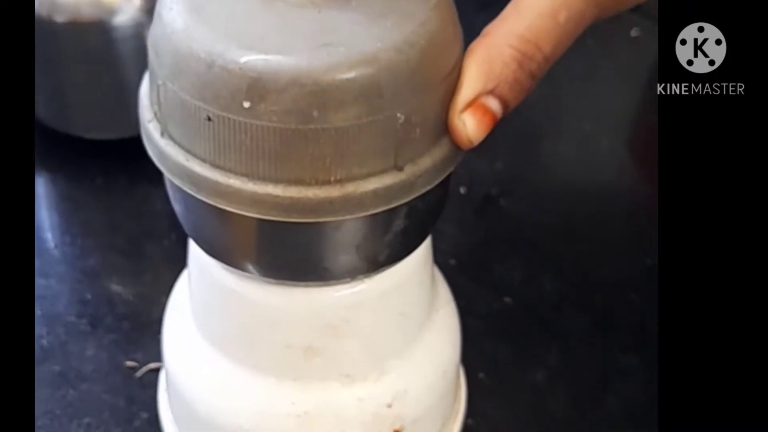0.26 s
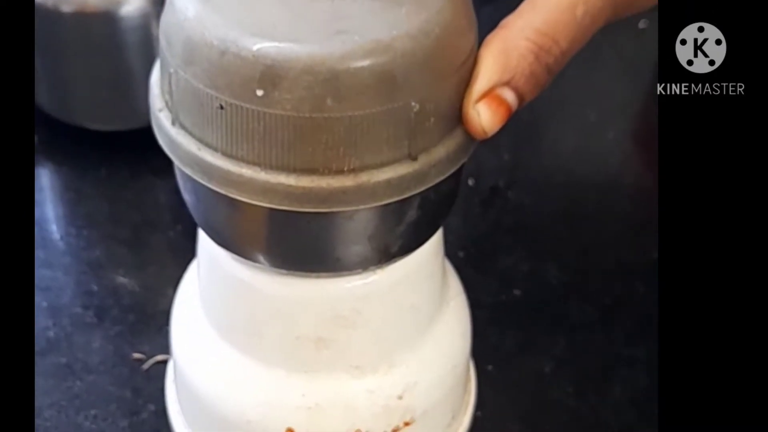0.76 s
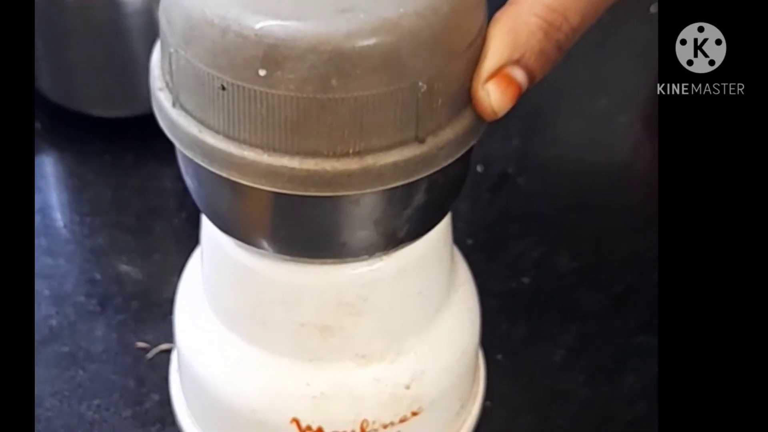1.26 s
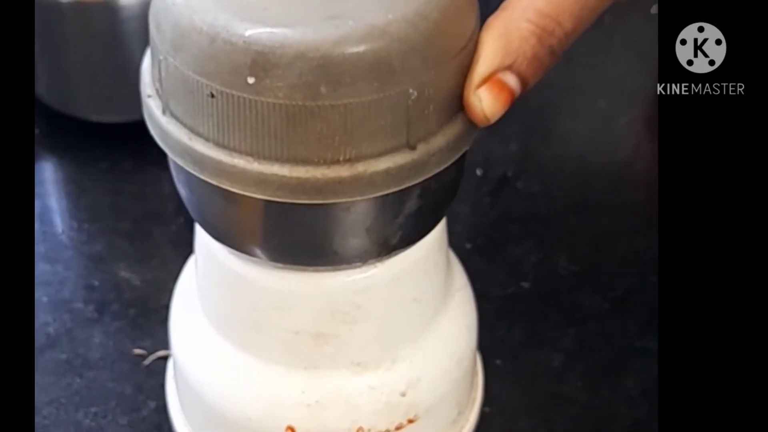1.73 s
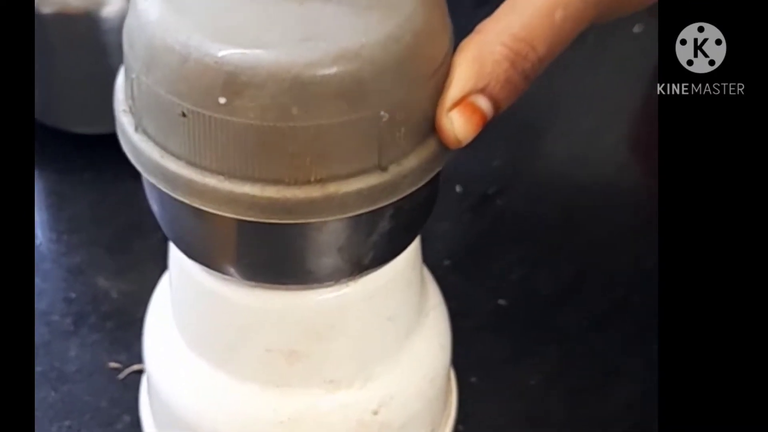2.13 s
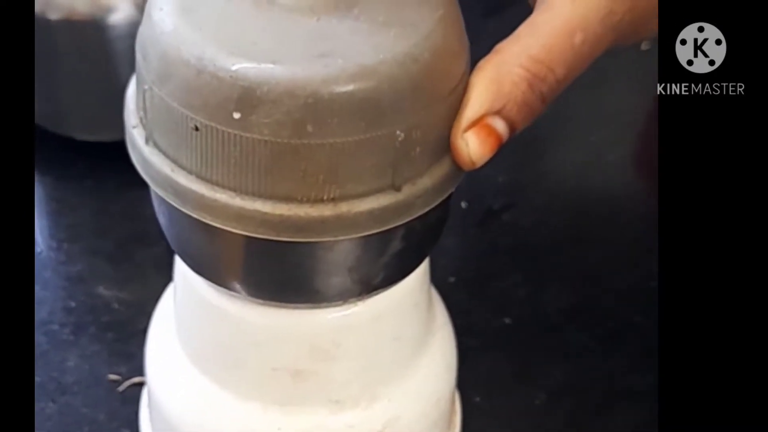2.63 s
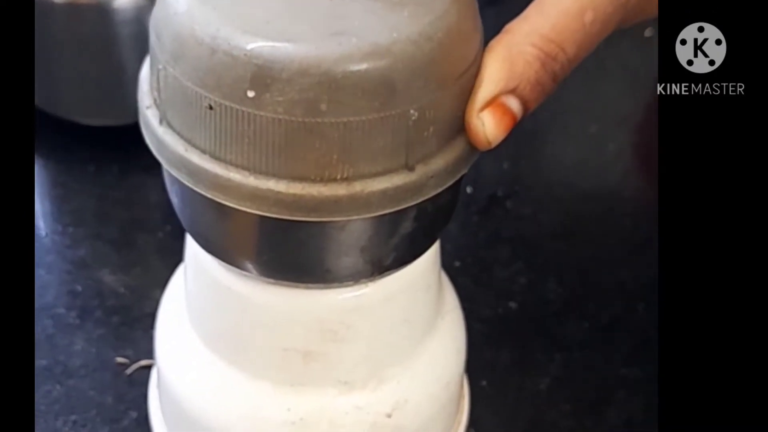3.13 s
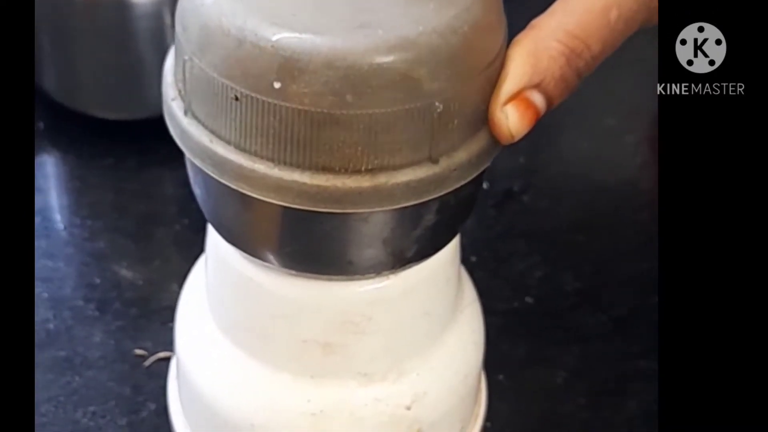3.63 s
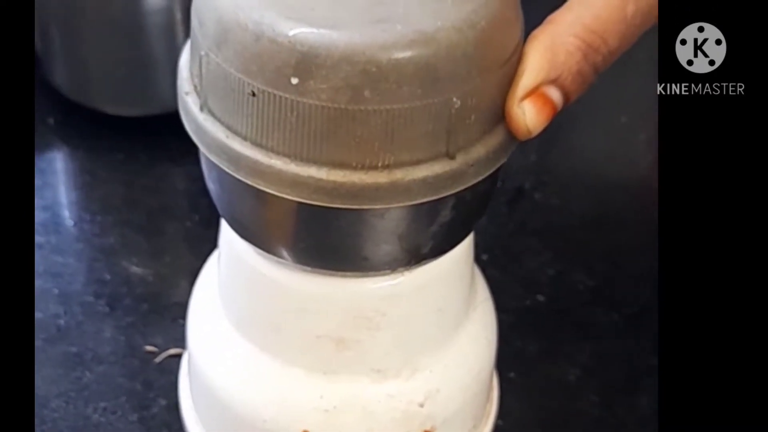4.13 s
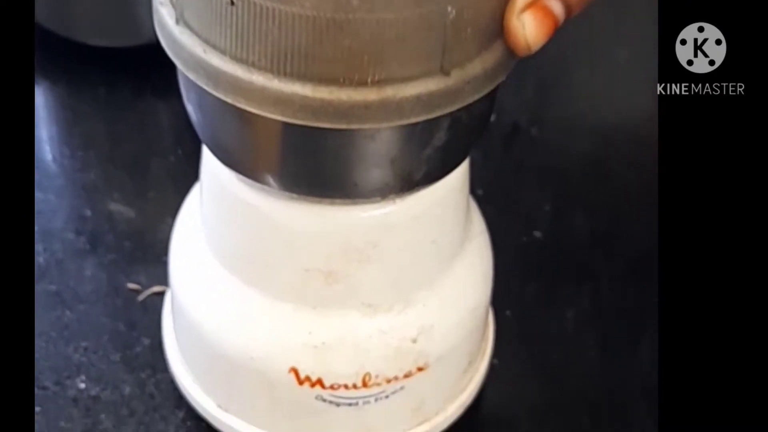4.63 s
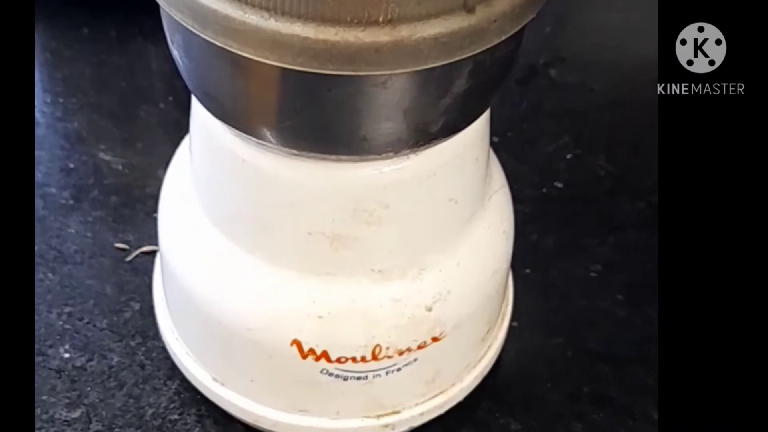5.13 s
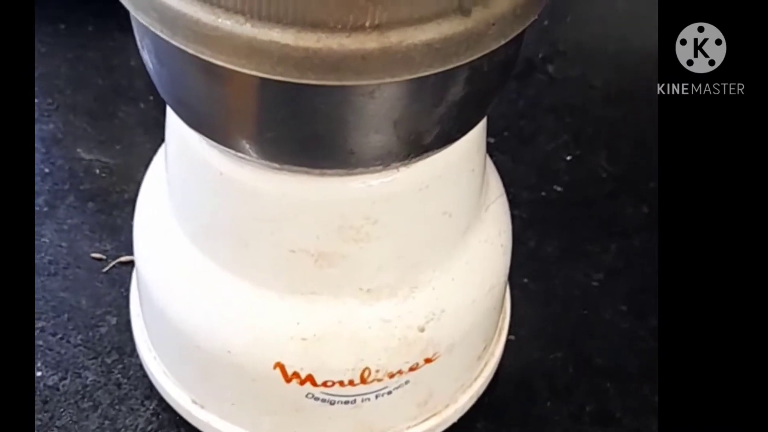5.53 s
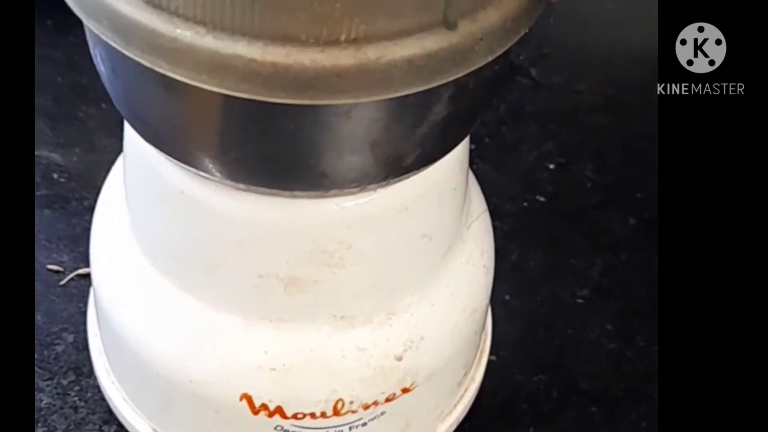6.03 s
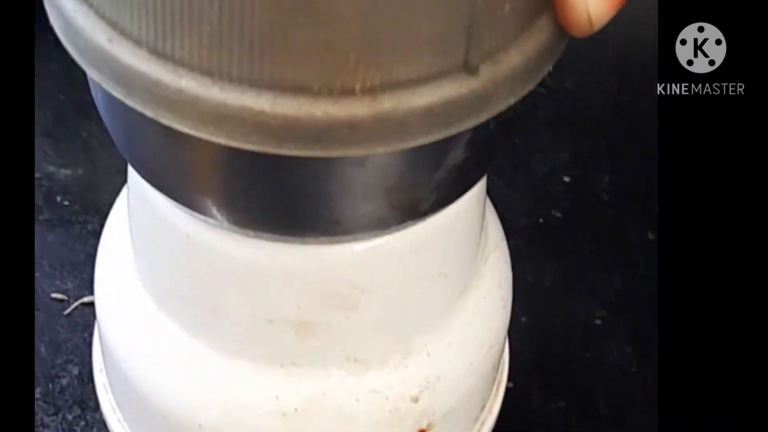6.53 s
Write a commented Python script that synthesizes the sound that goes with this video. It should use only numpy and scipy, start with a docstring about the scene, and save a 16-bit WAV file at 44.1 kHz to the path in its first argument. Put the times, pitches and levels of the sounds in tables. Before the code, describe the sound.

An electric blade grinder on a kitchen counter spins up right at the start, close to the microphone, reaching a steady hum and high whine within half a second, with a buzzing rasp and rushing air. Ground spice hisses round the steel cup in uneven surges, and coarse bits tick and crack against the wall. At about 2.3 seconds the motor cuts out and its pitch falls, while a few heavier pieces clatter in the cup. At 2.9 seconds, before it stops, it starts again and climbs back to full speed, the whine swelling around 4.2 seconds and shifting slightly in tone near 5. At about 6.1 seconds it switches off and coasts down with a few more rattles, still slowing near 7 seconds. Soft low thumps come irregularly throughout, mostly on the left, the strongest briefly dipping the whole sound.

```python
"""An electric blade grinder on a kitchen counter runs in two pulses, coasting down after each.
Its spinning motor hums and whines, shaken by the mains; its brushes rasp and air rushes round it.
Ground spice hisses round the steel cup, and coarse bits tick and clatter on the wall.
Soft low thumps reach mainly the left microphone port and briefly turn the whole sound down."""
import sys
import numpy as np
from scipy import signal
from scipy.fft import rfft, irfft
from scipy.io import wavfile
from scipy.ndimage import uniform_filter1d

SR = 44100
rng = np.random.default_rng(int(sys.argv[2]) if len(sys.argv) > 2 else 0)


def generate_wav(sig):
    """Save sig (samples, or channels by samples) to the path in sys.argv[1] as 16-bit PCM at SR."""
    pcm = np.round(np.clip(np.atleast_2d(sig).T, -1, 1) * 32767).astype(np.int16)
    wavfile.write(sys.argv[1], SR, pcm)


N = 298983
TIME = np.arange(N) / SR
FREQS = np.maximum(np.fft.rfftfreq(N, 1 / SR), 1)
LEFT_RIGHT = np.array([[1], [-1]])
FULL_SPEED_HZ = 345  # turns per second; "pace" is the speed as a share of this
TORQUE_HZ = 100.1  # the motor's twisting force pulses twice per mains cycle

# How alike noise is at the two microphone ports. Each row: frequency in Hz, likeness (1 is the same).
PORT_LIKENESS = [(100, 0.5), (300, 0.45), (1000, 0.2), (2000, 0.07), (4000, 0), (15000, 0)]
# Which side noise leans to. Each row: frequency in Hz, left minus right in dB.
PORT_BALANCE = [(60, 0), (150, 9), (300, -4.5), (600, 5.5), (1000, 0), (2000, -2), (5000, -0.5), (8500, 2),
                (11500, 1), (14000, -4.5)]
# The microphone moves from above the lid to beside the housing. Each row: time in seconds, share moved.
MICROPHONE_PATH = [(4.6, 0.26), (5.2, 1)]
# Low thumps. Each row: start in seconds, level in dB.
LOW_THUMPS = [(0.075, -27.5), (0.102, -24.5), (0.228, -19), (0.291, -23.5), (0.519, -29), (0.579, -33),
              (0.702, -26), (0.744, -35), (0.884, -40), (1.053, -26.5), (1.084, -14.5), (1.419, -33),
              (1.479, -34), (1.522, -34), (1.761, -26), (1.895, -38), (2.365, -34), (2.474, -31),
              (2.508, -32), (3.274, -28.5), (3.393, -29), (3.732, -28.5), (3.825, -25), (3.906, -28),
              (4.208, -26.5), (4.361, -28), (4.434, -30), (4.582, -25), (4.66, -27.5), (4.853, -29),
              (5.16, -35), (5.225, -30), (5.269, -23.5), (5.451, -39), (5.504, -28), (5.544, -26),
              (5.7, -33), (5.839, -34), (5.938, -21.5), (6.064, -32), (6.259, -34), (6.369, -36),
              (6.423, -24), (6.637, -36)]

# The notes at which cup and lid ring. Each row: frequency in Hz, width in Hz, level in dB.
CUP_RINGS = [(596, 20, -2.5), (927, 55, 7), (1103, 108, 7), (1432, 71, 0.5), (1930, 71, -2.5),
             (3086, 10.6, 9), (4810, 140, 0.5), (6230, 270, 1.5)]
# Heavy bits tumbling in the cup. Each row: start in seconds, level in dB.
TUMBLE_HITS = [(0.09, -39), (3.55, -33), (2.625, -36), (2.674, -34), (2.688, -47), (2.749, -34),
               (2.767, -46), (2.895, -35.5), (6.372, -51), (6.447, -39), (6.478, -54), (6.516, -41.5),
               (6.62, -44)]
# Coarse bits hitting the cup. Each row: start in seconds, level in dB, extra dB for the top ring.
SEED_HITS = [(0.102, -13.5, 2), (0.5033, -17, 5), (0.616, -17, 2), (0.864, -16, 6), (0.98, -18, -2),
             (1.076, -9, -4), (1.2368, -13, -5), (1.502, -22, 5), (1.587, -26, 2), (1.685, -23, 5),
             (1.8776, -19, 4), (1.9014, -25, 2), (2.0263, -11, -7), (2.103, -14, -9), (2.173, -13, -7),
             (2.1864, -22, -4), (2.341, -14, -2), (2.592, -11.5, -7), (2.7485, -16, -5), (2.99, -17, -8),
             (3.0164, -16, -3.5), (3.3922, -16.5, 4), (3.402, -17.5, 4), (3.48, -15.5, -3),
             (3.9813, -18, 0), (4.2956, -17, -1), (4.4033, -17, -1), (4.4827, -22, 1), (4.582, -7.5, -7),
             (4.695, -22, 6), (4.8215, -14, -2), (5.2, -14, 1), (5.4305, -20, 5), (5.5073, -12.5, -1.5),
             (5.683, -14, 0), (5.8097, -22, 4), (6.3724, -15.5, -2), (6.4431, -16, -3), (6.62, -13.5, -4)]
# The sound of spice sliding on the wall. Each row: frequency in Hz, level in dB.
SLIDE_COLOUR = [(700, -15.5), (2500, -8), (4000, -4), (5000, -4), (5500, -0.5), (6400, -4), (7200, -5),
                (8200, -17.5), (12000, -5)]
# The sound of fine spice flying. Each row: frequency in Hz, level in dB.
SPRAY_COLOUR = [(5000, -11.5), (8200, -6), (9800, -1.5), (11000, -1), (11500, 2), (12400, -5), (13300, 5),
                (13650, 1), (14650, 10), (15000, 2), (15600, 2.5)]
# Spice drops to the bottom, sooner once it is fine. Each row: time in seconds, pace at which it drops.
SETTLING_PACE = [(2.9, 0.27), (6.3, 0.41)]
# A heap slumps into the blade, or the blade runs clear.
# Each row: time in seconds, extra sliding in dB, extra spray in dB.
HEAP_SLUMPS = [(.1, 7, 3), (.27, -0.5, 5.5), (.65, 2.5, 6.5), (0.748, 3.5, 4.5), (1.042, 5.5, 5.5),
               (1.442, -2.5, 6.5), (1.73, 2, 5.5), (2.05, 4.5, 3), (2.179, 3, -2), (2.29, 1, 6),
               (2.48, 7, 7), (2.76, -1, -7), (2.94, 3, 1), (3.79, 2, 6), (4.07, 4.5, -3), (4.73, 3, 2),
               (4.978, 4, 0), (5.2, 1.5, 1), (5.6, 0.5, 3), (5.81, 0.5, 6), (5.92, 1, 2.5), (6.11, -0.5, 2),
               (6.21, -1.5, 4.5), (6.38, 0, 4.5), (6.57, -3.5, -3), (6.635, -3, 3)]

# Air and housing noise. Each row: frequency in Hz, level in dB.
RUSH_COLOUR = [(40, -19), (150, -44), (300, -0.5), (450, -12.5), (620, -25), (780, -18), (930, -13),
               (1100, 11.5), (1300, -8.5), (1650, 2.5), (2050, 5), (2500, 1.5), (3150, 3.5), (4300, -13)]
# The scrape of the brushes. Each row: frequency in Hz, level in dB.
RASP_COLOUR = [(600, -16), (950, 16), (1300, -0.5), (2100, 0.5), (3100, -3.5), (4200, -10.5)]
# Base level of rush, rasp and whine, one table per press. Each row: time in seconds, level in dB.
UPPER_MID_LEVELS = [
    [(0.3, -36), (0.47, -34), (1.81, -34), (2.11, -32.5), (2.4, -33.5)],
    [(3.2, -35.5), (4.26, -30), (4.5, -32.5), (5.84, -32.5), (6.22, -33)],
]
# Side tones from the pulsing torque. Each row: multiple of the turn rate, multiple of the torque rate,
# dB from above, dB from beside the housing, left minus right in dB, left's lead in radians.
TORQUE_TONES = [(1, 1, -62, -47, -2, 1.34), (2, -1, -59, -49, -6, -0.5), (2, 1, -46.5, -44, 3.5, -2.5),
                (2, 2, -50, -49, -4, 0.5), (3, -1, -52, -45, 7, 1), (3, 1, -37.5, -36, -11, 1.5),
                (3, 3, -55, -47, -2.5, -2.5), (4, -2, -57, -49, -15, 2.5), (4, -1, -51, -50, -8, -3),
                (4, 1, -42, -56, -10.5, 1.5), (5, 1, -56, -52, -6, 2.5), (5, 2, -49.5, -58, -1, 0.7),
                (5, 3, -62, -48, -6, 2), (6, -1, -55, -57, -11, 2), (6, 1, -58, -48, -4, 2.5),
                (6, 2, -62, -42.5, 9, 3), (7, 1, -56, -53, -3, 2), (8, 3, -63, -43, 2, -2.5)]
# The high tones of the whine. Each row: multiple of the turn rate, dB from above,
# dB from beside the housing, left minus right in dB, left's lead in radians.
WHINE_TONES = [(5, -7.5, -15, 0, 1.4), (6, -5.5, -9.5, -5.5, 1.82), (7, -10.5, -17, -2, -.5),
               (8, -14, -12, -11, 1.2), (9, -18.5, -13, -6, 1.6), (10, -22, -17, -5, -0.67),
               (11, -20.5, -20, 17, -0.32)]
# The whine swells as the second press reaches full speed. Each row: time in seconds, extra level in dB.
WHINE_BOOST = [(3.55, 0), (3.85, 1.5), (4.25, 2.5), (4.6, -1), (5.2, 1)]
# How strongly the housing answers a gliding overtone. Each row: frequency in Hz, level in dB.
HOUSING_RESPONSE = [(300, -24), (480, -13), (600, -12), (760, -9), (900, -1.5), (1080, 0), (1330, -14),
                    (1600, -4), (2000, -22), (3000, -19)]
# How body and counter swell or dip the lowest tone. Each row: frequency in Hz, change in dB.
COUNTER_RESPONSE = [(135, -10), (148, 16), (158, 18.5), (176, -4), (203, 5.5), (226, -8.5), (255, 2.5),
                    (290, 0)]
# Base levels of the four hum tones, one table per press. Each row: time in seconds, then dB for each.
HUM_LEVELS = [
    [(0.24, -41.5, -39.5, -35, -38), (0.285, -30, -47, -33.5, -49), (0.36, -35.5, -48.5, -35, -48),
     (0.6, -29, -45, -32.5, -54), (0.82, -28, -46, -32.5, -46), (1.2, -31, -38, -30.5, -39.5),
     (1.58, -29, -40, -29, -48), (1.8, -29, -43, -30, -45), (2.32, -30, -40.5, -31, -43),
     (2.43, -34, -61, -34, -45)],
    [(3.09, -35, -41, -36, -34), (3.172, -40, -45, -35, -40), (3.186, -27.5, -48, -35, -43),
     (3.3, -31, -55, -36.5, -58), (3.48, -27.5, -48.5, -32.5, -44), (3.85, -29.5, -45.5, -35.5, -54),
     (4.0, -32, -42, -27.5, -43), (4.32, -28.5, -36.5, -26, -47.5), (5.02, -26, -41.5, -32.5, -35),
     (5.27, -28, -47.5, -38.5, -34.5), (6.05, -28, -48, -38.5, -38), (6.18, -29, -44.5, -29, -43),
     (6.24, -29.5, -41, -28, -33), (6.33, -32, -47, -53, -49)],
]
# How the four hum tones behave. Each row: left minus right in dB, left's lead in radians,
# fall in dB per octave of slowing, flutter in dB.
HUM_RULES = [(-3.5, 0.8, 19.5, 1.52), (-3, 0.69, 19, 2.1), (-3.5, 0.061, 34, 2), (-3, 1, 12, 3.5)]
# Presses of the switch. Each row: on in seconds, off in seconds, seconds to coast to 37% of the speed.
PRESSES = [(-0.095, 2.325, .55), (2.905, 6.145, .595)]
# The speed the load allows, creeping up as the spice gets finer, one table per press.
# Each row: time in seconds, turns per second.
SPEED_UNDER_LOAD = [
    [(0.79, 334), (0.84, 338), (0.916, 338), (0.96, 339.5), (1.2, 342), (1.42, 342), (1.8, 346),
     (2.06, 345)],
    [(3.7, 337), (4.2, 344), (4.9, 343.4), (5.15, 346.8), (5.5, 348), (5.85, 349), (6.05, 346)],
]


def from_db(db):
    """Turn decibels into a factor to multiply by."""
    return 10 ** (np.asarray(db) / 20)


def unit_power(x):
    """Scale a signal to an average power of 1."""
    return x / np.sqrt(np.mean(x ** 2) + 1e-20)


def in_time(rows):
    """Join a table's points in time, giving one curve per value column."""
    s, *columns = np.transpose(rows)
    return [np.interp(TIME, s, c) for c in columns]


def per_press(tables):
    """Curves in time, with each press's table taking over at its switch-on."""
    out = np.array(in_time(tables[0]))
    for (on_s, _, _), rows in zip(PRESSES[1:], tables[1:]):
        out = np.where(TIME < on_s, out, in_time(rows))
    return out


def over_hz(points):
    """Join a table's points to get a value at every frequency."""
    hz, value = np.transpose(points)
    return np.interp(np.log(FREQS), np.log(hz), value)


def drift(rate_hz):
    """A smooth random wobble of about 1 either way."""
    r = np.exp(-80 * np.pi * rate_hz / SR)
    slow = signal.lfilter([1], [1, -2 * r, r * r], rng.standard_normal(N // 40 + 2002))[2000:]
    return np.interp(np.arange(N) / 40, np.arange(len(slow)), unit_power(slow))


def resonate(x, hz, width_hz):
    """Ring at one frequency; a narrower width rings longer."""
    r = np.exp(-np.pi * width_hz / SR)
    feedback = [1, -2 * r * np.cos(2 * np.pi * hz / SR), r * r]
    return signal.lfilter(np.array([1, 0, -1]) * (1 - r * r) / 2, feedback, x + 1e-18)


def at_ports(pair, colour_db=0):
    """Blend two unrelated signals into one coloured sound of power 1 at the two microphone ports."""
    mid, side = rfft(pair)
    alike = over_hz(PORT_LIKENESS)
    both = np.sqrt(1 + alike) * mid + np.sqrt(1 - alike) * side * LEFT_RIGHT
    return unit_power(irfft(both * from_db(colour_db + LEFT_RIGHT * over_hz(PORT_BALANCE) / 2), N))


def tone(phase, level_db, pan_db, lead):
    """One pure tone, with its own level and timing at each port."""
    gain = from_db(level_db) * from_db(LEFT_RIGHT * pan_db / 2)
    return gain * np.cos(phase + rng.uniform(0, 2 * np.pi) + LEFT_RIGHT * lead / 2)


def strikes(rows):
    """One click for each row of start in seconds and level in dB."""
    s, level_db = np.transpose(rows)
    return np.bincount(np.clip(np.round(s * SR).astype(int), 0, N - 1), from_db(level_db), N)


def die_away(clicks, t60):
    """Give each click a tail that fades by 60 dB in t60 seconds."""
    return signal.lfilter([1], [1, -from_db(-60 / (t60 * SR))], clicks + 1e-18)


def kitchen(x, t60=.3):
    """Dense echoes off counter and walls, different at each port."""
    t = TIME[:int(t60 * SR)]
    echoes = unit_power(rng.standard_normal((2, len(t))) * from_db(-60 * t / t60))
    return signal.fftconvolve(x * np.ones((2, 1)), echoes / np.sqrt(len(t)), axes=1)[:, :N]


def thumps(pace, hz=78.6, width_hz=63.6, right_db=-24.5):
    """Low swings that die fast, the hardest with a slap; weak ones come at random as the motor turns."""
    weak = (rng.random(N) < 60 * pace ** 2 / SR) * from_db(-46.5 + 2 * rng.standard_normal(N))
    pushes = strikes(LOW_THUMPS) + weak
    swing = signal.sosfilt(signal.butter(2, 143, fs=SR, output="sos"), resonate(pushes, hz, width_hz))
    slap = from_db(2) * resonate(pushes ** 2, hz=273, width_hz=97)
    both = signal.sosfilt(signal.butter(2, 34, "high", fs=SR, output="sos"), swing - slap)
    gain = from_db(11) * SR / (np.pi * width_hz)
    return gain * both * from_db([[0], [right_db]])


def ticks(pace, hz=10000, width_hz=4000):
    """Stray hard husks tick singly on the steel, each nearer one port or the other."""
    hits = (rng.random(N) < 28 * pace / SR) * from_db(3 * np.clip(rng.standard_normal((2, N)), -2, 1.5))
    bursts = die_away(hits, t60=.012) * rng.standard_normal((2, N))
    return from_db(-16.5) * resonate(resonate(bursts, hz, width_hz), hz, width_hz)


def cup(x, damping):
    """Cup and lid ring with whatever strikes them; higher damping gives a duller, shorter ring."""
    return at_ports(sum(from_db(db) * resonate(x, hz, width * damping) for hz, width, db in CUP_RINGS))


def tumbles():
    """Single heavy bits clatter round the cup, ringing it and scraping its wall."""
    ring = cup(rng.standard_normal((2, N)), damping=3)
    scrape = at_ports(rng.standard_normal((2, N)), over_hz(SLIDE_COLOUR))
    return from_db(4) * die_away(strikes(TUMBLE_HITS), t60=.26) * (ring + from_db(-3) * scrape)


def seeds(top_ring_hz=13200, crack_db=-2, scatter_db=-6.5):
    """A coarse bit cracks on the steel, dull or bright by where it lands; its pieces pepper the wall."""
    colour_db = np.maximum(over_hz(SPRAY_COLOUR), over_hz(SLIDE_COLOUR) - 7)
    steel = at_ports(rng.standard_normal((2, N)), colour_db)
    top = irfft(rfft(steel) * (FREQS > top_ring_hz), N)
    out = 0
    for band, is_top in ((steel - top, 0), (top, 1)):
        hits = strikes([(s, db + is_top * top_db) for s, db, top_db in SEED_HITS])
        crack = die_away(hits, t60=.015)
        scatter = die_away(hits, t60=.35) - crack
        out += (from_db(crack_db) * crack + from_db(scatter_db) * scatter) * band
    return out


def grains(per_s, spread_db, t60):
    """Random tiny impacts of uneven size, each a short burst of noise."""
    sizes = from_db(spread_db * np.clip(rng.standard_normal(N), -2.5, 2.5))
    hits = rng.random(N) < per_s / SR
    power = die_away(hits * sizes ** 2 / np.maximum(per_s, 100), t60 / 2)  # denser, but no louder
    return unit_power(np.sqrt(power) * rng.standard_normal((2, N)))


def spice_levels(pace, rise_s=.034, fall_s=.042):
    """Sliding and spray in dB: they shift at each slump and fade when the blade is too slow to lift."""
    settle_db = -10 * np.log10(1 + (in_time(SETTLING_PACE)[0] / pace) ** 6)
    slide_db = -27.5 + 7.5 * np.log2(pace) + settle_db
    spray_db = -29.5 - 1.5 * np.log2(pace) + settle_db
    for s, more_slide_db, more_spray_db in HEAP_SLUMPS:
        swell = np.exp(-((TIME - s) / np.where(TIME < s, rise_s, fall_s)) ** 2)
        slide_db += more_slide_db * swell
        spray_db += more_spray_db * swell
    return slide_db, spray_db


def spice(pace):
    """Powder sweeps round the cup in clumps; the faster the blade, the denser its impacts."""
    slide_db, spray_db = spice_levels(pace)
    clumps = drift(15)
    slide = at_ports(grains(4500 * pace ** 1.7, spread_db=3.2, t60=.014), over_hz(SLIDE_COLOUR))
    spray = at_ports(grains(2800 * pace ** 1.1, spread_db=2.7, t60=.014), over_hz(SPRAY_COLOUR))
    knocks = cup(grains(900 * pace, spread_db=-1.5, t60=.0026), damping=1.1)
    knocks *= from_db(-7.5 - 5 * np.log2(pace))  # they stand out more as the blade slows
    wall = from_db(slide_db + .94 * clumps) * (slide + knocks)
    return wall + from_db(spray_db + .5 * clumps + .46 * drift(5.7)) * spray


def rush(angle, pace, powered, octaves_down, mid_db):
    """Air and housing noise beats with each turn and with the torque; a straining motor adds more."""
    strain = from_db(-29) * powered * np.maximum(1 - pace, 0)
    gain = np.hypot(from_db(mid_db - .5 - 28 * octaves_down), strain)
    beat = 1 + .27 * np.cos(angle) + .061 * np.cos(2 * np.pi * TORQUE_HZ * TIME)
    roll_off_db = -10 * np.log10(1 + (FREQS / 6000) ** 4)
    return gain * at_ports(rng.standard_normal((2, N)) * beat, over_hz(RUSH_COLOUR) + roll_off_db)


def rasp(angle):
    """The motor's brushes scrape the same pattern every turn and bite at each peak of the current."""
    pattern = sum(np.cos(k * angle + rng.uniform(0, 2 * np.pi)) for k in range(4, 14))
    bite = np.cos(np.pi * TORQUE_HZ * TIME) ** 24
    return at_ports(kitchen(pattern * (bite - bite.mean())), over_hz(RASP_COLOUR))


def side_tones(angle, beside, waver_db=2.5):
    """The pulsing torque shakes the motor and puts extra tones beside each main one."""
    out = 0
    for k, m, above_db, beside_db, pan_db, lead in TORQUE_TONES:
        level_db = above_db + (beside_db - above_db) * beside + 1.4 + waver_db * drift(6.4)
        out += tone(k * angle + 2 * np.pi * m * TORQUE_HZ * TIME, level_db, pan_db, lead)
    return out


def glide(angle, speed, octaves_down, flutter_db=4):
    """The loose rotor knocks once a turn; its overtones swell in the housing and rattle at low speed."""
    hz, response_db = np.transpose(HOUSING_RESPONSE)
    out = 0
    for k in range(3, 13):
        rattle = 2 * np.sqrt(octaves_down) * drift(35)
        level_db = np.interp(k * speed, hz, response_db) + flutter_db * drift(11.5)
        out += tone(k * angle + rattle, level_db, pan_db=2, lead=rng.uniform(-1.2, 1))
    return out


def whine(angle, beside, octaves_down, waver_db=2.5):
    """High multiples of the turn rate ring out in spells and blur when the rotor is slow."""
    out = 0
    for k, above_db, beside_db, pan_db, lead in WHINE_TONES:
        level_db = above_db + (beside_db - above_db) * beside + waver_db * drift(3.5)
        rattle = 3 * np.sqrt(octaves_down) * drift(40)
        out += tone(k * angle + .25 * drift(7.2) + rattle, level_db, pan_db, lead)
    return out


def hum(angle, speed, octaves_down):
    """Unbalance and the passing blade make four fluttering tones; returns the lowest and the rest."""
    rattle = np.minimum(octaves_down, 1) * drift(45)
    tones = []
    for k, (base_db, rules) in enumerate(zip(per_press(HUM_LEVELS), HUM_RULES), 1):
        pan_db, lead, fall_db, flutter_db = rules
        load = .4 * drift(4) + .65 * drift(16) + .2 * (k - 1) * drift(55)
        level_db = base_db + 3.5 - fall_db * octaves_down + flutter_db * (1 + octaves_down) * load
        tones.append(tone(k * angle + k ** 1.5 * rattle / 2, level_db, pan_db, lead))
    counter_db = np.interp(speed, *np.transpose(COUNTER_RESPONSE))
    swell_db = uniform_filter1d(counter_db, size=2200)  # ringing needs time to build up
    return tones[0] * from_db(swell_db), sum(tones[1:])


def rotor(run_up_s=.147):
    """Turns per second and power on or off: speed nears what the load allows, then friction takes it."""
    speed, powered = np.zeros(N), np.zeros(N)
    loaded, = per_press(SPEED_UNDER_LOAD)
    for on_s, off_s, coast_s in PRESSES:
        start_speed = np.interp(on_s, TIME, speed)
        running = loaded + (start_speed - loaded) * np.exp(-np.maximum(TIME - on_s, 0) / run_up_s)
        coasting = np.interp(off_s, TIME, running) * np.exp(-np.maximum(TIME - off_s, 0) / coast_s)
        speed = np.select([TIME < on_s, TIME < off_s], [speed, running], coasting)
        powered += (TIME >= on_s) * (TIME < off_s)
    return np.maximum(speed, 1), powered


def motor(angle, speed, powered, octaves_down, mid_db):
    """All the motor's tones and its rasp together; below full speed, echoes blur the overtones."""
    pace = speed / FULL_SPEED_HZ
    slack = np.clip((.98 - pace) * 7, 0, 1)  # 0 at full speed, 1 when well below it
    beside, = in_time(MICROPHONE_PATH)
    torque = uniform_filter1d(powered, size=900)
    lowest, overtones = hum(angle, speed, octaves_down)
    glide_gain = slack * from_db(-37.5 - 4 * torque - 12.5 * octaves_down)  # torque steadies the rotor
    overtones += glide_gain * glide(angle, speed, octaves_down)
    whine_fall_db = (13 - powered) * octaves_down  # a little steeper with the power off
    whine_gain = from_db(mid_db + 2.5 + in_time(WHINE_BOOST)[0] - whine_fall_db) * (1 - slack / 2)
    overtones += whine_gain * whine(angle, beside, octaves_down)
    blur = .9 * slack
    overtones = np.sqrt(1 - blur ** 2) * overtones + kitchen(blur * overtones)
    shaking = pace ** 2 * side_tones(angle, beside)
    brushes = from_db(mid_db - 3.5 - 14 * octaves_down) * rasp(angle)
    return lowest + overtones + torque * (shaking + brushes)


def scene():
    """The rotor's speed drives motor, air and spice; coarse bits and low thumps join in."""
    speed, powered = rotor()
    pace = speed / FULL_SPEED_HZ
    octaves_down = np.maximum(np.log2(.92 / pace), 0)  # halvings of speed below 92% of full
    mid_db, = per_press(UPPER_MID_LEVELS)
    angle = 2 * np.pi * np.cumsum(speed * (1 + .0007 * drift(20))) / SR
    air = rush(angle, pace, powered, octaves_down, mid_db)
    bits = seeds() + tumbles() + ticks(pace)
    low = thumps(pace)
    return motor(angle, speed, powered, octaves_down, mid_db) + air + spice(pace) + bits + low


def gain_control(x, knee_db=-18, most_cut_db=7.5, release_db_per_s=106, look_ahead_s=.0071):
    """Strong bass at the left port, such as a thump, briefly turns the whole sound down."""
    bass = signal.sosfilt(signal.butter(4, 180, fs=SR, output="sos"), x[0])
    cut_db = most_cut_db * bass ** 2 / (bass ** 2 + from_db(knee_db) ** 2)
    held_db = np.maximum.accumulate(cut_db + release_db_per_s * TIME) - release_db_per_s * TIME
    early_db = np.interp(TIME + look_ahead_s, TIME, uniform_filter1d(held_db, size=128))
    return x * from_db(-early_db)


def record(dry):
    """The level dips under thumps, and the treble above 15550 Hz is cut steeply."""
    return signal.sosfilt(signal.ellip(12, .1, 80, 15550, fs=SR, output="sos"), gain_control(dry))


dry = scene()
out = record(dry)
generate_wav(out)
```